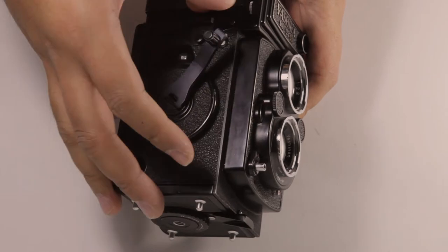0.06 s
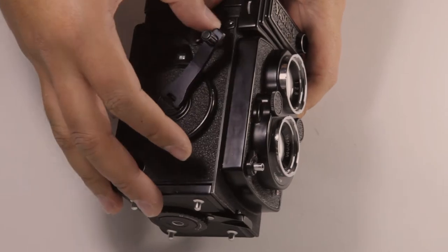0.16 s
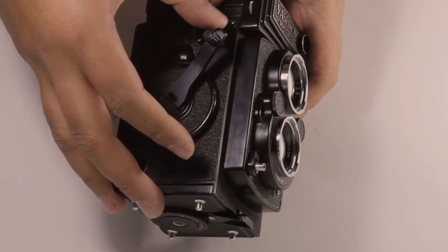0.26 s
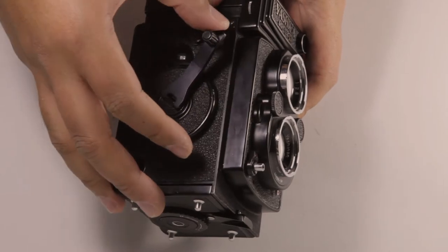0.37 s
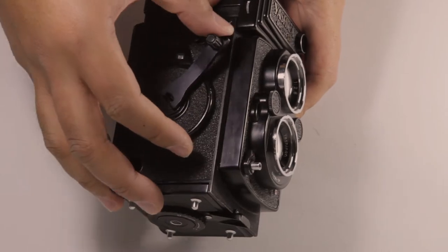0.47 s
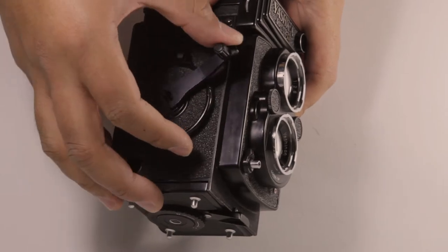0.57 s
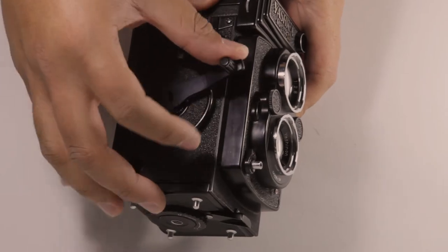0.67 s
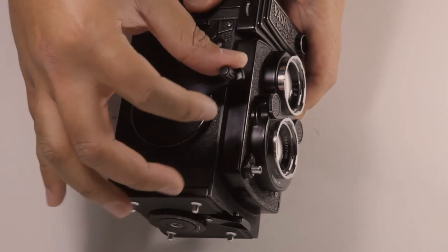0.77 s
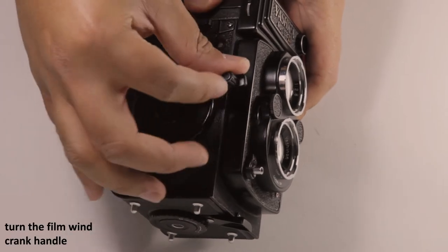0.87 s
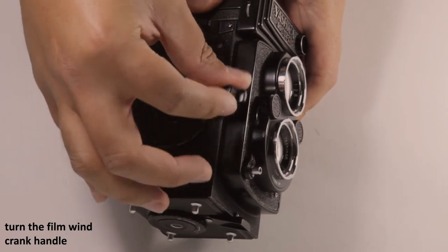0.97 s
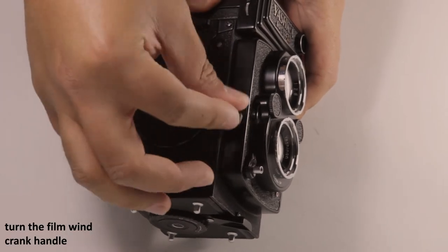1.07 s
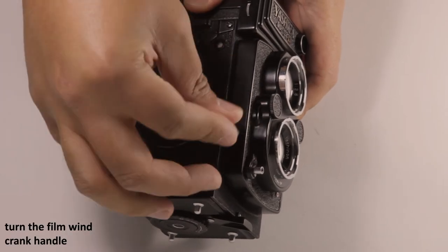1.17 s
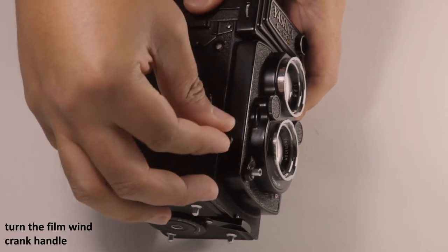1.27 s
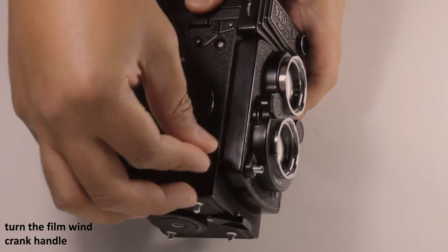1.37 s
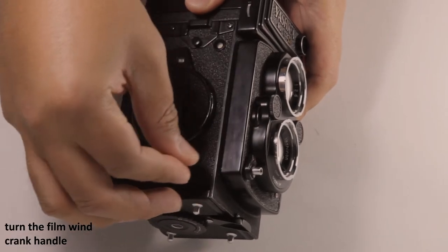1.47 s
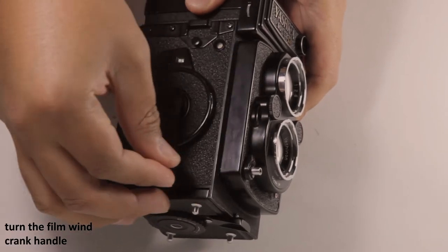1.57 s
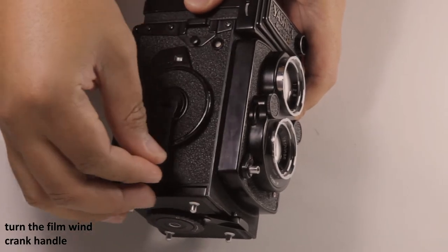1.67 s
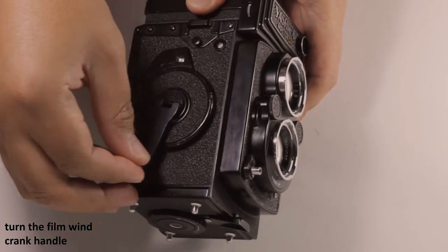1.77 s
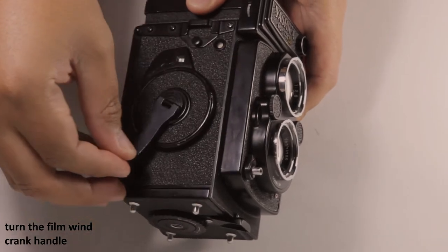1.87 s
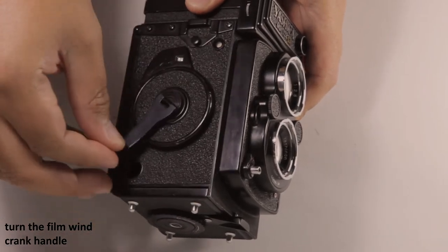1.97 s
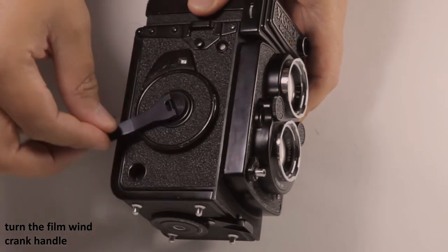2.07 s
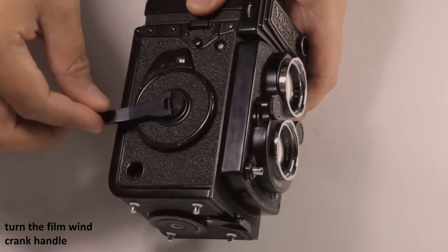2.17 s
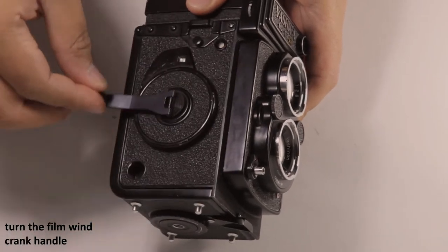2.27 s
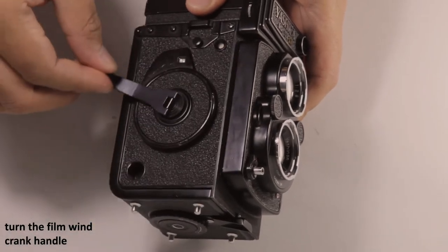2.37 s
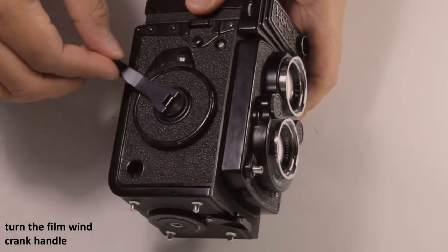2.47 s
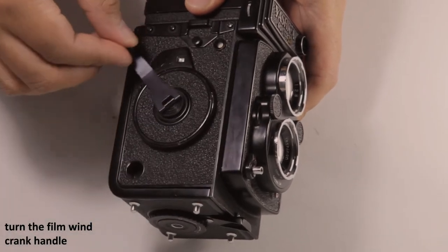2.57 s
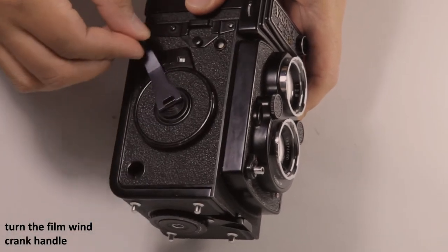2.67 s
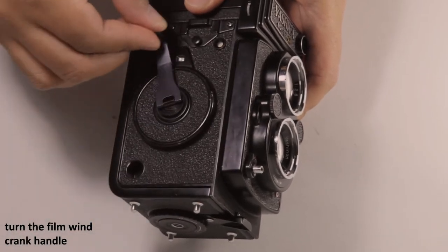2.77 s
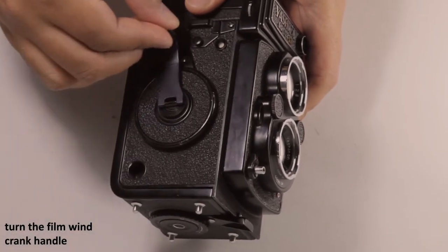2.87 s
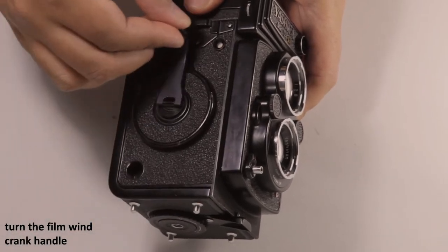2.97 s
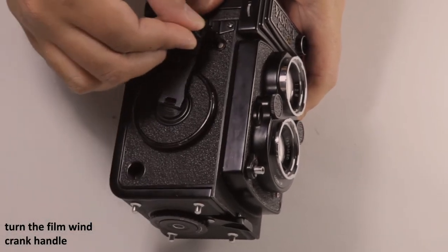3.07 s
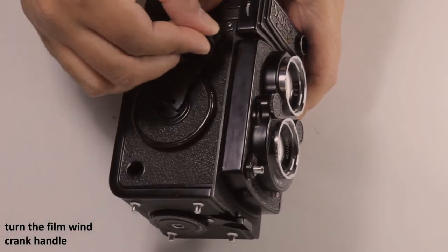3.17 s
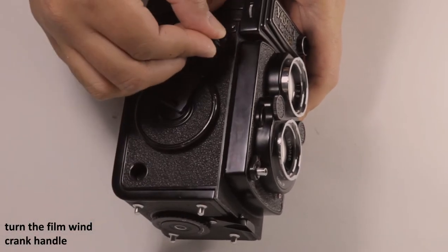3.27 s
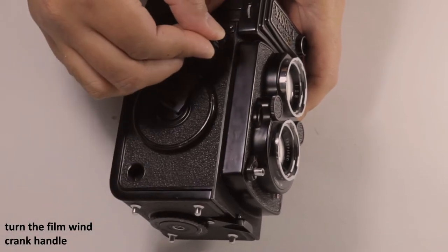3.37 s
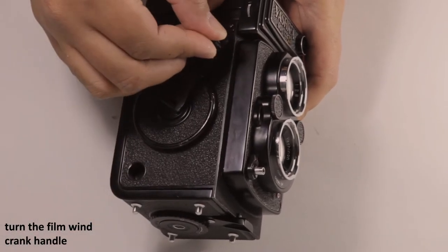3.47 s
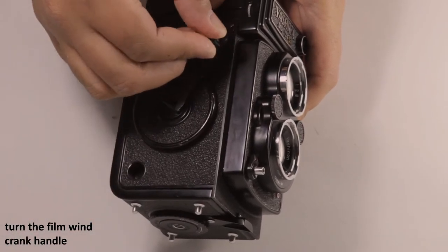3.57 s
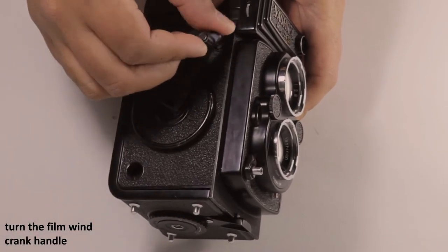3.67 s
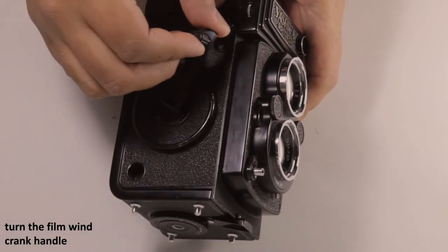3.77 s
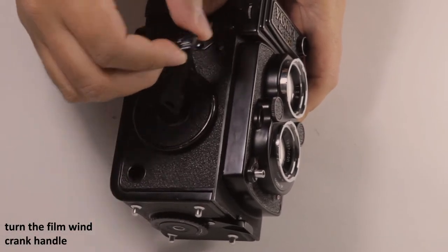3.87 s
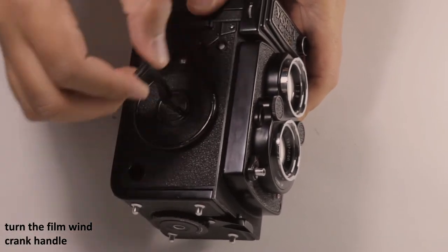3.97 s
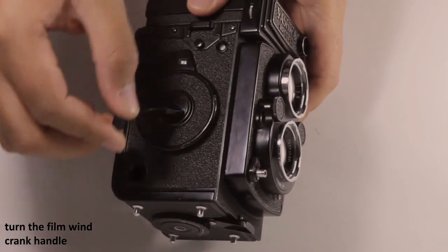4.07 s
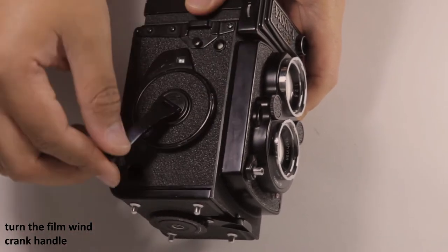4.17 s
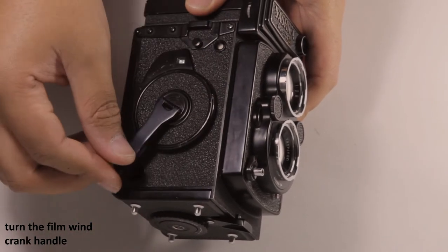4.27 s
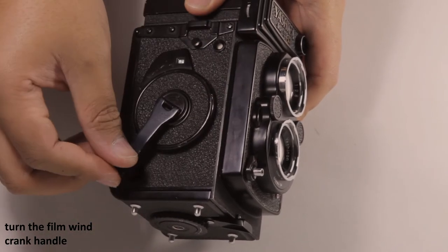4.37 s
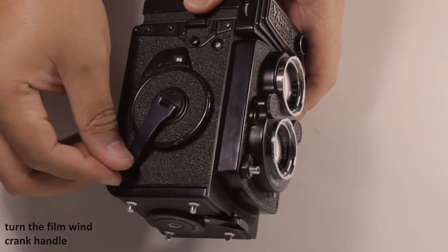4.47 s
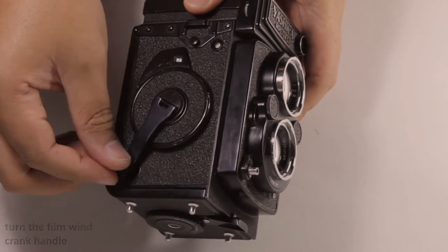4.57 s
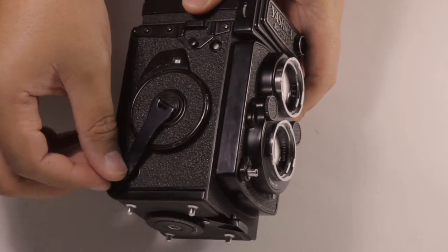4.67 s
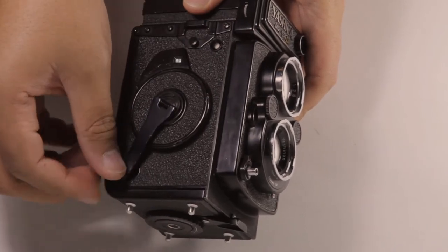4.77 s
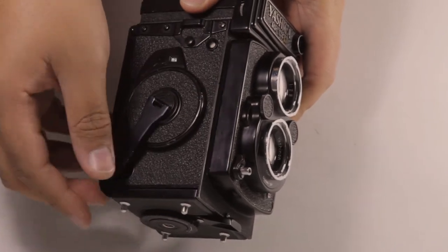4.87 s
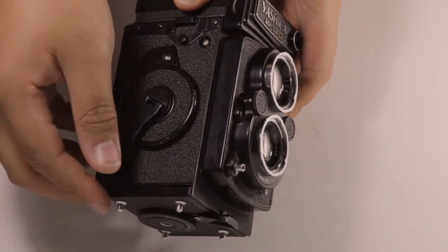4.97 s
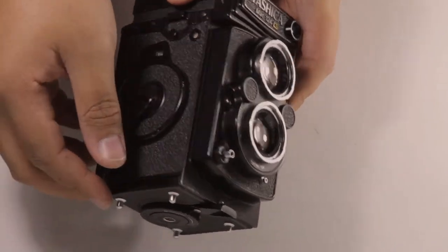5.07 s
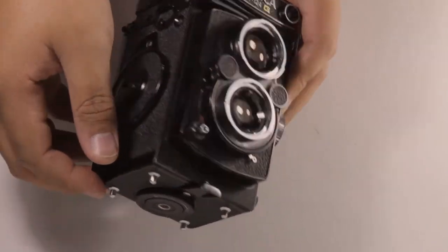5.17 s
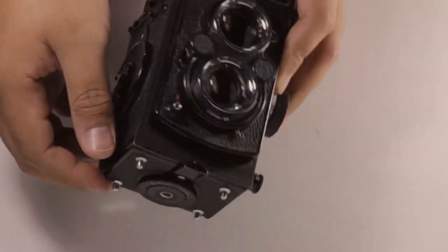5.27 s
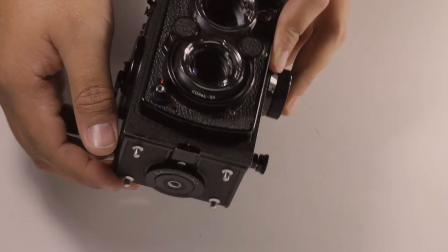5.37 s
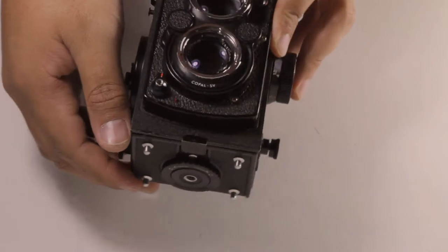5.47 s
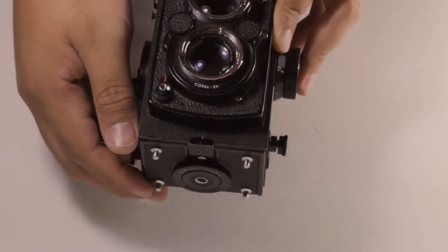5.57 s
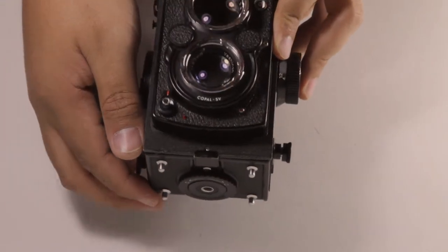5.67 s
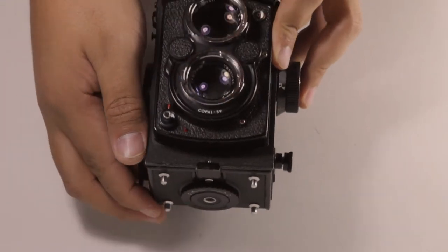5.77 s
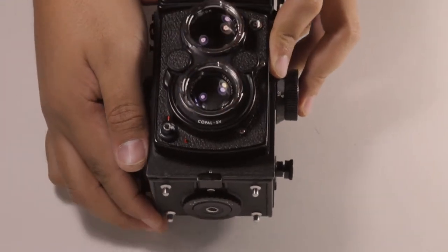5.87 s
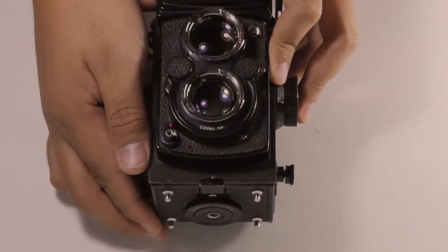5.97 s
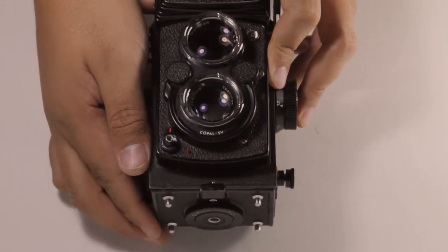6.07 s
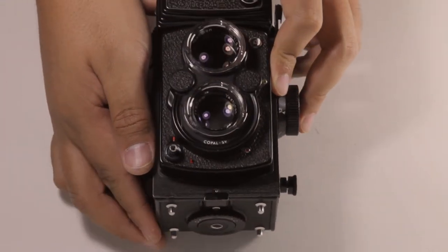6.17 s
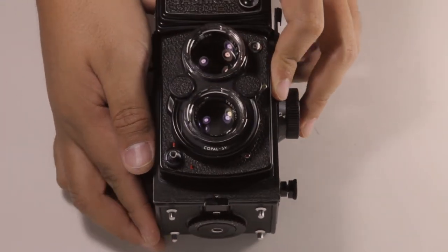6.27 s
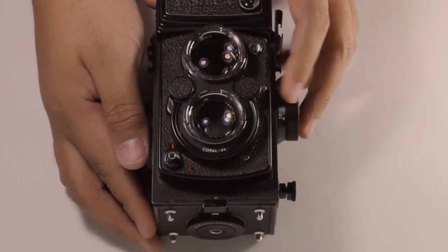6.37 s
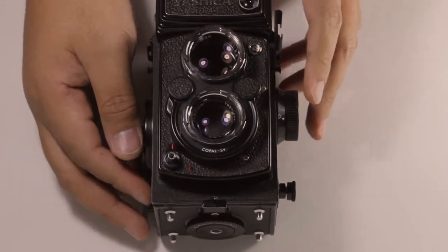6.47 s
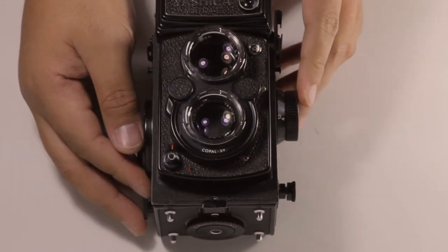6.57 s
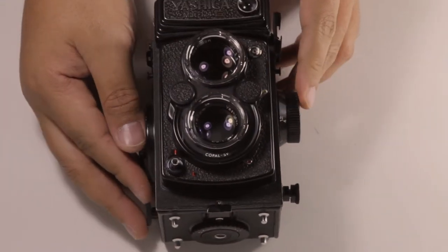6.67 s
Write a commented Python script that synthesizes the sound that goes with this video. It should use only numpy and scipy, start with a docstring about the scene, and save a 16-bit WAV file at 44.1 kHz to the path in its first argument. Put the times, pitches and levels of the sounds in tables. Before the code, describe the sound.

A small quiet room with faint steady ventilation and a low hum, heard very close. From 0 to 0.5 s fingers rub softly and bump a metal camera case. At 0.5 s a few ratchet clicks begin, with a heavy gear clack at 0.66. From about 0.95 to 3.2 s crisp, bright steel clicks run in uneven spurts, densest around 1.0, 1.35, 2.05 and 2.3, over a gritty gear grind; duller clacks at 1.55, 1.9, 2.1, 2.4, 2.8 and 3.2 make the case ring briefly. A faint low table rumble swells near 1.65 and fades. After 3.35 it is almost still, with a tiny brush at 3.6. At 4.3 a sharp loud metal stop strikes and rings shortly, followed by tiny ticks, a fold click at 4.64 and a thin snap at 4.82. From 5.0 skin slides and light taps, stronger after 5.85; a small ringing knob click lands at 6.58.

```python
"""A small, quiet room: hands wind a metal twin-lens film camera, over faint ventilation and hum.
A pawl clicks over ratchet teeth in uneven spurts; the gears grind and knock against the ringing case.
The crank strikes its stop, folds and snaps home; then fingers shift the camera and a side knob clicks.
Contacts are shaped noise bursts, rings are damped sines, rubbing is noise broken into small slips."""
import sys
import numpy as np
from scipy import signal
from scipy.fft import rfft, irfft
from scipy.io import wavfile

SR = 44100
rng = np.random.default_rng(int(sys.argv[2]) if len(sys.argv) > 2 else 0)


def unload_audio(sound):
    """Save the sound as a 16-bit wav file, at the path given as the first command line argument."""
    columns = np.transpose(np.atleast_2d(sound))
    # keep every value between -1 and 1, then stretch to whole-number steps
    steps = np.round(np.clip(columns, -1, 1) * 32767)
    wavfile.write(sys.argv[1], SR, steps.astype(np.int16))


N = 296352
RING_T_S = np.arange(SR // 7) / SR  # time axis of one blow


def amp(db):
    """Decibels to gain."""
    return 10 ** (np.asarray(db) / 20)


def unit(x):
    """Scales to rms 1."""
    return x / np.sqrt(np.mean(x ** 2) + 1e-20)


def blow(x, db):
    """Scales to the energy of 10 ms at rms level db."""
    energy = np.sum(x ** 2) + 1e-20
    return amp(db) * x * np.sqrt(SR / 100 / energy)


def read(points, hz):
    """Interpolates a (f, value) table on a log-frequency axis."""
    f, value = np.transpose(points)
    return np.interp(np.log(hz + 1), np.log(f + 1), value)


def add(mix, start_s, sound):
    """Adds a sound into the mix at start_s."""
    part = mix[max(round(start_s * SR), 0):][:len(sound)]
    part += sound[:len(part)]


def coloured(x, colour, size=1024):
    """Minimum-phase filter with the given spectrum: causal, so attacks stay sharp."""
    hz = abs(np.fft.fftfreq(size, 1 / SR))
    log_gain = np.log(amp(read(colour, hz)))
    taps = np.fft.ifft(np.exp(np.conj(signal.hilbert(log_gain)))).real
    return signal.oaconvolve(x, taps[:size // 2])[:len(x)]


def contact(colour, db, decay_s, after_db=-20, after_s=.005, rise_s=.0001, size=2048):
    """Parts meet: a dense chatter that dies within milliseconds, then a weaker, longer buzz."""
    t = RING_T_S[:size]
    decay = np.exp(-t / decay_s) + amp(after_db) * np.exp(-t / after_s)
    force = (1 - np.exp(-t / rise_s)) * decay
    spectrum = rfft(rng.standard_normal(size) * force)
    # many tiny impacts: energy even over frequency, level following the force
    flat = irfft(spectrum / (abs(spectrum) + 1e-12))
    chatter = np.cos(np.angle(signal.hilbert(flat)))
    return blow(coloured(chatter * force, colour), db)


def ring(modes, db, rise_s, spread_db, detune):
    """Damped modes; each blow lands differently and shares its energy out anew."""
    hz, mode_db, t60_s = np.transpose(modes)[:, :, None]
    size, shift, phase = rng.standard_normal((3, len(modes), 1))
    level = amp(mode_db + spread_db * size - 60 * RING_T_S / t60_s)
    waves = level * np.sin(2 * np.pi * (hz * (1 + detune * shift) * RING_T_S + phase))
    return blow(waves.sum(0) * (1 - np.exp(-RING_T_S / rise_s)), db)


def sliding(colour, grain_db, slips_per_s):
    """Friction: coloured noise whose level wanders in small uneven slips."""
    slip_axis = np.arange(N) / SR * slips_per_s
    slips = np.interp(slip_axis, np.arange(N // 20), rng.standard_normal(N // 20))
    return unit(coloured(rng.standard_normal(N) * amp(grain_db * slips), colour))


# ventilation spectrum: f/Hz, relative level/dB
AIR_COLOUR = [(21, -37.5), (35, -7), (60, -8.5), (113, -5), (139, -6), (231, -4.5), (290, -10.5), (322, -2),
              (384, -7.5), (785, -6), (1450, -20), (1600, -16.5), (2020, -20.5), (12600, -26.5),
              (15500, -32.5)]
AIR_DB = -54.5


def air(hum_hz=118, hum_db=-70):
    """Steady ventilation: spectrally shaped noise plus a faint sine hum."""
    gain = amp(read(AIR_COLOUR, np.fft.rfftfreq(N, 1 / SR)))
    noise = irfft(rfft(rng.standard_normal(N)) * gain, N)
    hum = np.sin(2 * np.pi * hum_hz * np.arange(N) / SR)
    return amp(AIR_DB) * unit(noise) + amp(hum_db) * unit(hum)


# table shaken as the crank passes the bottom of its turn: t/s, level/dB, rise/s, decay/s
TABLE_SHAKE = (1.65, -62.5, 0.05, 1.1)


def table(hz=39, width_hz=9):
    """Lowest table resonance: narrow-band noise that swells and slowly settles."""
    peak_s, db, rise_s, decay_s = TABLE_SHAKE
    t = np.arange(N) / SR - peak_s
    shape = np.exp(-((np.fft.rfftfreq(N, 1 / SR) - hz) / width_hz) ** 2)
    noise = unit(irfft(rfft(rng.standard_normal(N)) * shape, N))
    return noise * amp(db) * np.exp(np.minimum(t / rise_s, -t / decay_s))


# room decay: f/Hz, t60/s
ROOM_T60 = [(300, 0.47), (1000, 0.23), (3000, 0.27), (7000, 0.26), (11000, 0.197), (16000, 0.14)]
# table and near walls, before sway: delay/s, gain
NEAR_ECHOES = [(.0021, .25), (.0034, .36), (.0043, .22), (.0084, .17), (.0097, .1), (0.0149, .08)]


def reflections(wet_db, onset_s=0.0038, sway=.12):
    """Response for one hand position: near echoes and a short tail dying band by band."""
    hz, t, z = signal.stft(rng.standard_normal(SR // 3), SR, nperseg=256)
    decay = amp(-60 * t / read(ROOM_T60, hz)[:, None])
    tail = signal.istft(z * decay, SR, nperseg=256)[1]
    tail *= 1 - np.exp(-(np.arange(len(tail)) / SR / onset_s) ** 2)
    response = amp(wet_db) * tail / np.linalg.norm(tail)
    for delay_s, gain in NEAR_ECHOES:
        add(response, delay_s * (1 + sway * rng.uniform(-1, 1)), np.array([gain]))
    return response


def room(x, wet_db, count=4):
    """The hands keep moving: the sound crossfades cyclically through several reflection patterns."""
    position = np.arange(N) / SR * 31  # patterns per second
    out = x.copy()
    for k in range(count):
        share = np.sin(np.pi / 2 * np.minimum((position - k) % count, 2))
        out += signal.oaconvolve(x * share, reflections(wet_db))[:N]
    return out


def strokes(rows, build):
    """Gain of sliding fingers: each stroke swells for the share `build`, then lets go."""
    out = np.zeros(N)
    for start_s, length_s, db in rows:
        progress = np.linspace(0, 1, int(length_s * SR))
        arch = np.interp(progress, [0, np.clip(build, .1, .9), 1], [0, 1, 0])
        add(out, start_s, amp(db) * np.sin(np.pi / 2 * arch))
    return out


# skin slides on case and knob: t/s, length/s, peak level/dB
RUB_STROKES = [(0, 0.376, -67), (5.02, 0.108, -54), (5.86, 0.181, -54.5), (6.01, .17, -49.5),
               (6.21, 0.1584, -50.5), (6.33, .12, -54.5), (6.46, .19, -51), (6.59, 0.1785, -50.5)]
# f/Hz, relative level/dB
RUB_SPECTRUM = [(100, -7), (350, -6), (550, 0), (900, -8), (1400, 0.5), (2500, -11), (5000, -17.5),
                (9000, -23), (16000, -22.5)]
# dry fingertips brush the leatherette: t/s, length/s, peak level/dB
BRUSH_STROKES = [(3.583, 0.047, -61), (5.063, .056, -61.5), (5.856, .04, -51.5), (6.145, .036, -51),
                 (6.334, 0.076, -59.5)]
# f/Hz, relative level/dB
BRUSH_SPECTRUM = [(500, -25.5), (1500, -1.5), (3500, 1), (5700, 1.5), (9000, -4.5), (13000, 5),
                  (16000, -11)]
# fingers and handle bump the case: t/s, level/dB before trim
CASE_BUMPS = [(.113, -42.5), (.224, -46), (.469, -36.5), (.505, -40.5), (0.6504, -37.5), (1.673, -33.5),
              (1.742, -36), (2.034, -34), (2.568, -43), (3.2662, -36.5), (3.281, -40), (4.466, -37),
              (4.483, -38), (4.838, -44.5), (6.274, -46.5), (6.564, -40), (6.581, -43.5)]
# f/Hz, relative level/dB
BUMP_SPECTRUM = [(80, -19), (250, -3), (500, 2.5), (800, -1.5), (1300, -4.5), (2200, -11), (4000, -27.5),
                 (16000, -40)]
GRIP_DB = -68  # the holding hand never rests entirely


def fingers():
    """Skin friction in strokes over a constant grip, plus soft short bumps."""
    rub_gain = amp(GRIP_DB) + strokes(RUB_STROKES, build=0.616)
    out = sliding(RUB_SPECTRUM, grain_db=3.0, slips_per_s=140) * rub_gain
    brush_gain = strokes(BRUSH_STROKES, build=0.526)
    out += sliding(BRUSH_SPECTRUM, grain_db=4.5, slips_per_s=510) * brush_gain
    for t_s, db in CASE_BUMPS:
        add(out, t_s, contact(BUMP_SPECTRUM, db - 5, decay_s=0.00169, after_db=-19.5, after_s=0.0152))
    return out


# crank hits its stop, folds over, snaps home: t/s, level/dB, rattle decay/s
STOP_HIT = (4.3114, -15.7, .00085)
FOLD_HIT = (4.6367, -27, 0.00157)
SNAP_HIT = (4.8244, -28, 0.00074)
# their spectra: f/Hz, relative level/dB
STOP_SPECTRUM = [(300, -33.5), (950, -33), (1230, -11), (1450, -20), (1780, -13), (2300, -22), (3650, -12),
                 (5000, -18), (6700, -7), (7900, -13), (9500, -2), (12500, -3), (14500, -4.5),
                 (16000, -10.5)]
FOLD_SPECTRUM = [(200, -42.5), (520, -10), (750, 6.5), (1050, -6), (1650, 6), (2100, -7.5), (2560, 0),
                 (2950, -6), (3350, -4), (4500, -9.5), (8000, -15), (11500, -12), (12600, -5), (14500, -26)]
SNAP_SPECTRUM = [(300, -16), (1400, -21.5), (3000, -48.5), (8000, -30), (9500, -18), (11200, -2),
                 (13400, -6), (14100, 4), (14700, -4), (16000, -6)]
# crank arm modes: f/Hz, relative level/dB, t60/s
ARM_MODES = [(1215, 0, .055), (1780, -8, .04), (3620, -4, .02)]
ARM_DB = -31.5
# spring glides: t/s, length/s, start f/Hz, end f/Hz, level/dB
SPRING_GLIDES = [(4.457, 0.085, 12050, 11240, -59), (4.64, 0.093, 12200, 10730, -63.5)]


def crank_handle():
    """Crank strikes its stop and rings, folds and snaps home; its relaxing spring glides down in pitch."""
    out = np.zeros(N)
    t_s, db, decay_s = STOP_HIT
    add(out, t_s, contact(STOP_SPECTRUM, db, decay_s, after_db=-25.5, after_s=.008, rise_s=.00005))
    add(out, t_s, ring(ARM_MODES, ARM_DB, rise_s=.0008, spread_db=1.0, detune=.003))
    t_s, db, decay_s = FOLD_HIT
    add(out, t_s, contact(FOLD_SPECTRUM, db, decay_s, after_db=-31, after_s=0.006))
    t_s, db, decay_s = SNAP_HIT
    add(out, t_s, contact(SNAP_SPECTRUM, db, decay_s, after_db=-30.5, after_s=.004))
    for t_s, length_s, start_hz, end_hz, db in SPRING_GLIDES:
        hz = np.linspace(start_hz, end_hz, int(length_s * SR))
        tone = np.sin(2 * np.pi * np.cumsum(hz) / SR)
        add(out, t_s, amp(db) * unit(tone * signal.windows.tukey(len(hz), .5)))
    return out


# light metal taps of handle and knob: t/s, level/dB
METAL_TAPS = [(3.2666, -41), (5.11, -49.5), (5.99, -45.5), (6.238, -52.5), (6.3685, -57), (6.446, -51.5),
              (6.5808, -43)]
# f/Hz, relative level/dB
TAP_SPECTRUM = [(200, -11), (600, 4.5), (1500, -0.5), (3000, 1), (6000, -8), (12000, -16), (16000, -20)]
# side knob clicks into place: t/s, ring level/dB
KNOB_SEATS = (6.581, -40)
# f/Hz, relative level/dB, t60/s
KNOB_MODES = [(698, -0.5, 0.034), (1457, -7, 0.035), (2388, -4, 0.041), (3044, -0.5, 0.0484),
              (3328, -6.5, 0.041), (4047, -10, 0.034)]


def taps_and_knob():
    """Light metal contacts; the side knob rings as it clicks into place."""
    out = np.zeros(N)
    for t_s, db in METAL_TAPS:
        add(out, t_s, contact(TAP_SPECTRUM, db, decay_s=0.0012, after_db=-15, after_s=0.0159))
    t_s, db = KNOB_SEATS
    add(out, t_s, ring(KNOB_MODES, db, rise_s=0.00045, spread_db=2.5, detune=0.0058))
    return out


SPEED_WINDOW_S = .2


def crank_speed():
    """Teeth per second under the pawl: drops smoothed by a Hann window."""
    speed = np.zeros(N)
    window = np.hanning(int(SPEED_WINDOW_S * SR))
    for t_s, _ in PAWL_DROPS:
        add(speed, t_s - SPEED_WINDOW_S / 2, window / window.sum() * SR)
    return speed


# gear train takes up its play: t/s, clack level/dB, case level/dB, both before trim
GEAR_KNOCKS = [(0.6626, -17.5, -26.5), (1.1782, -35.5, -36), (1.1868, -29.5, -33), (1.425, -36, -38),
               (1.5482, -22.5, -29), (1.8913, -26.5, -29.5), (2.1244, -21, -26.5), (2.4104, -38, -39),
               (2.417, -25, -32), (2.813, -25, -27), (3.1695, -29.5, -29), (3.351, -44, -46),
               (4.4468, -46, -37), (4.4522, -47, -39)]
# spectra of clack, case thud (before tilt), grind: f/Hz, relative level/dB
KNOCK_SPECTRUM = [(200, -27), (700, -22), (1500, -8), (2400, -4), (3200, 4), (4500, 0), (6300, 5),
                  (9000, -4), (11000, 4), (16000, -4.5)]
THUD_SPECTRUM = [(150, -29.5), (550, -12.5), (740, 5.5), (950, -14.5), (1220, 4.5), (1450, -6.5),
                 (1800, 1.5), (2400, -6.5), (5000, -15.5), (16000, -66.5)]
GRIND_SPECTRUM = [(200, -18.5), (720, 4), (950, -12), (1220, 1), (1600, -5.5), (2200, 1.5), (4000, -9),
                  (7000, -15.5), (16000, -6)]
# case modes, before tilt: f/Hz, relative level/dB, t60/s
CASE_MODES = [(482, -17, 0.0284), (603, -19, 0.03), (716.3, -4, 0.067), (814, -8.5, 0.049),
              (1170.5, -4.5, 0.06), (1228.3, 2.5, 0.031), (1357, -8, 0.016), (1593, -8, .035),
              (1752, -9.5, 0.037), (2125, -19.5, 0.061)]
# case answers more brightly as winding goes on: t/s, tilt/(dB per octave)
CASE_BRIGHTNESS = [(.66, -6), (3.17, 2.5)]
USUAL_TEETH_PER_S, GRIND_DB, GRIND_POWER = 25, -57.5, 1.4  # grind level at usual speed, power of speed


def gears():
    """Grind grows with crank speed; heavier clacks thump the case and make it ring."""
    grind_gain = amp(GRIND_DB) * (crank_speed() / USUAL_TEETH_PER_S) ** GRIND_POWER
    out = sliding(GRIND_SPECTRUM, grain_db=7.5, slips_per_s=300) * grind_gain
    for t_s, db, case_db in GEAR_KNOCKS:
        tilt = np.interp(t_s, *np.transpose(CASE_BRIGHTNESS))  # dB per octave about 1 kHz
        thud = [(hz, gain_db + tilt * np.log2(hz / 1000)) for hz, gain_db in THUD_SPECTRUM]
        modes = [(hz, gain_db + tilt * np.log2(hz / 1000), t60_s) for hz, gain_db, t60_s in CASE_MODES]
        add(out, t_s, contact(KNOCK_SPECTRUM, db - 1, decay_s=0.00407, after_db=-27.5,
                              after_s=0.0125, rise_s=0.000319))
        add(out, t_s, contact(thud, case_db - 6.5, decay_s=0.0059, after_db=-19.5,
                              after_s=0.014, rise_s=0.00101))
        add(out, t_s, ring(modes, case_db - 1, rise_s=0.00124, spread_db=1.0, detune=0.015))
    return out


# pawl drops, in spurts as the hand pushes the crank: t/s, level/dB before trim
PAWL_DROPS = [(0.5086, -31), (0.5555, -30), (0.5998, -30), (0.6345, -28), (0.8057, -30.5), (0.9586, -26.5),
              (.9918, -19), (1.0126, -19), (1.0386, -24.5), (1.0873, -28), (1.1481, -29), (1.2016, -23),
              (1.3173, -28.5), (1.3444, -17.5), (1.3634, -18.5), (1.3834, -28.5), (1.424, -20),
              (1.463, -22.5), (1.4964, -27), (1.54, -21.5), (1.6878, -41), (1.7014, -24), (1.7135, -29.5),
              (1.7266, -25.5), (1.7576, -28.5), (1.8034, -26), (1.8561, -25.5), (1.889, -27), (1.943, -31),
              (1.991, -25), (2.017, -19), (2.0384, -19.5), (2.0633, -20.5), (2.0917, -30), (2.1202, -20.5),
              (2.149, -25), (2.2554, -23.5), (2.2798, -18.5), (2.2973, -21), (2.3176, -21.5),
              (2.348, -29.5), (2.393, -30.5), (2.4209, -25.5), (2.503, -25.5), (2.5459, -23.5),
              (2.578, -27.5), (2.6147, -28.5), (2.6724, -27), (2.7213, -22.5), (2.7522, -29), (2.8009, -30),
              (2.8525, -35), (2.9445, -27.5), (2.985, -26), (3.0316, -26.5), (3.0918, -26), (3.1335, -28.5),
              (3.351, -38.5), (4.2265, -48.5), (4.4455, -38.5), (4.4899, -50)]
# click (before tilt and variation) and side plate: f/Hz, relative level/dB
PAWL_SPECTRUM = [(400, -35.5), (1500, -28.5), (2500, -20.5), (4000, -17.5), (6500, -5.5), (8800, -7),
                 (10000, -4), (10900, 5.5), (11700, -5), (12500, 2.5), (14000, -2), (16000, -14.5)]
PLATE_SPECTRUM = [(400, -23), (1500, -15), (2200, -5), (2600, -11.5), (3100, 0.5), (3700, -6), (4800, -1),
                  (6500, -1.5), (8500, -3), (16000, -21.5)]
# small steel parts: f/Hz, relative level/dB, t60/s
STEEL_MODES = [(5160, -9.5, .12), (6290, 0, 0.27), (6609, 2.5, 0.19), (6789, -2.5, .16), (7493, -4, 0.23),
               (8804, -7.5, .16), (9900, -13.5, .13), (10632, -8.5, .15), (11300, -12, 0.084),
               (12388, -11, 0.1), (13200, -5, .14)]
# duller near the end of crank travel, bright on the way back: t/s, tilt/(dB per octave)
PAWL_BRIGHTNESS = [(2.6, 0), (3.1, -3), (4.3, 2)]
USUAL_DB = -25  # drop level at which the values below hold
TILT_PER_FORCE_DB = .22  # dB per octave for each dB of force
CLICK_DECAY_S, CLICK_HALVING_DB = .00088, 20  # decay, and extra force that halves it
PLATE_DB = -12  # re drop level; dull drops move the plate more
PAWL_CASE_DB, CASE_DB_PER_DB = -49, 1.2  # case ring, and its rise per dB of force


def ratchet(wander=0.026, vary_db=1.5):
    """Pawl drops click, brighter and shorter with force; plate answers slower, steel and case ring."""
    out = np.zeros(N)
    hz, shape_db = np.transpose(PAWL_SPECTRUM)
    teeth = rng.standard_normal((len(PAWL_DROPS), len(hz) + 1))  # no two teeth quite alike
    for (t_s, db), tooth in zip(PAWL_DROPS, teeth):
        force_db = db - USUAL_DB
        tilt = np.interp(t_s, *np.transpose(PAWL_BRIGHTNESS)) + TILT_PER_FORCE_DB * force_db
        tilt_db = tilt * np.log2(np.maximum(hz, 3000) / 9000)
        tooth_hz = hz * (1 + wander * np.tanh(tooth[0]))
        colour = np.c_[tooth_hz, shape_db + tilt_db + vary_db * tooth[1:]]
        decay_s = CLICK_DECAY_S * .5 ** (force_db / CLICK_HALVING_DB)
        case_db = PAWL_CASE_DB + CASE_DB_PER_DB * force_db
        add(out, t_s, contact(colour, db - 1.08, decay_s, after_db=-19.5, after_s=0.0038))
        add(out, t_s, contact(PLATE_SPECTRUM, db + PLATE_DB - tilt, decay_s=0.0026, after_db=-19.5,
                              after_s=0.014, rise_s=0.00039))
        add(out, t_s, ring(STEEL_MODES, db - 25, rise_s=.0004, spread_db=5.5, detune=.0005))
        add(out, t_s, ring(CASE_MODES, case_db, rise_s=.001, spread_db=0.5, detune=0.022))
    return out


def scene():
    """Camera parts reflected by the room, over table rumble and air."""
    camera = fingers() + crank_handle() + taps_and_knob() + gears() + ratchet()
    return (room(camera, wet_db=-11.0) + table() + air())[None]


EDGE_HZ = 16200


def record(dry):
    """Band limit: linear-phase low-pass at EDGE_HZ."""
    taps = signal.firwin(301, EDGE_HZ, window=("kaiser", 8), fs=SR)
    return signal.oaconvolve(dry, taps[None], "same")


dry = scene()
out = record(dry)
unload_audio(out)
```